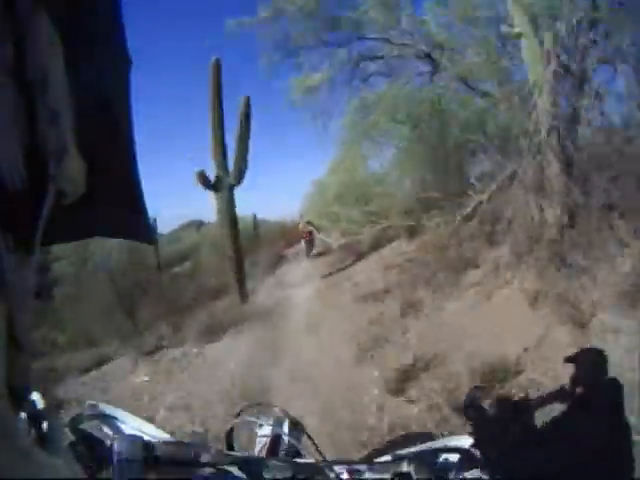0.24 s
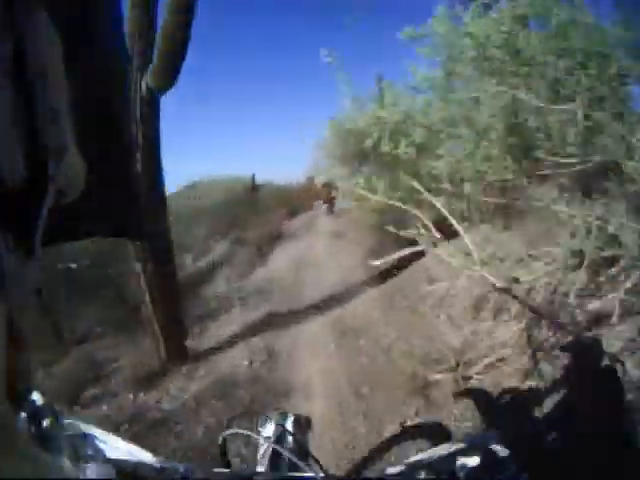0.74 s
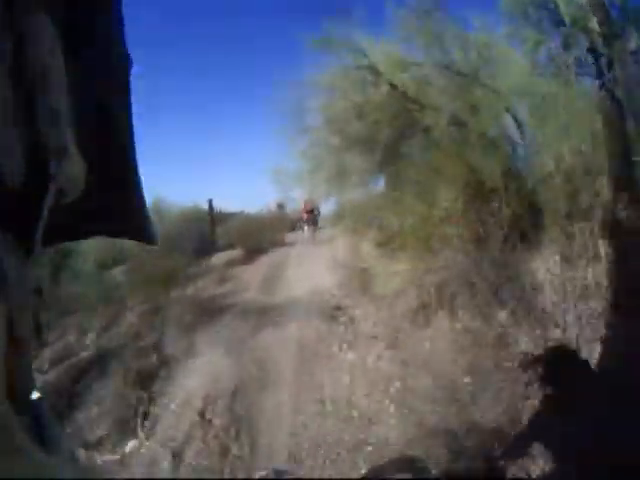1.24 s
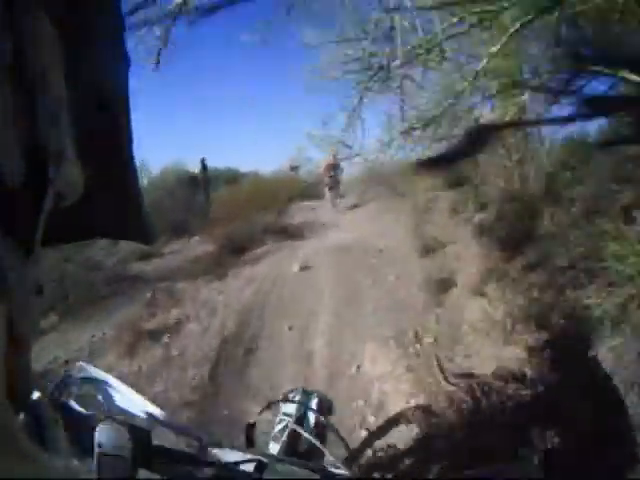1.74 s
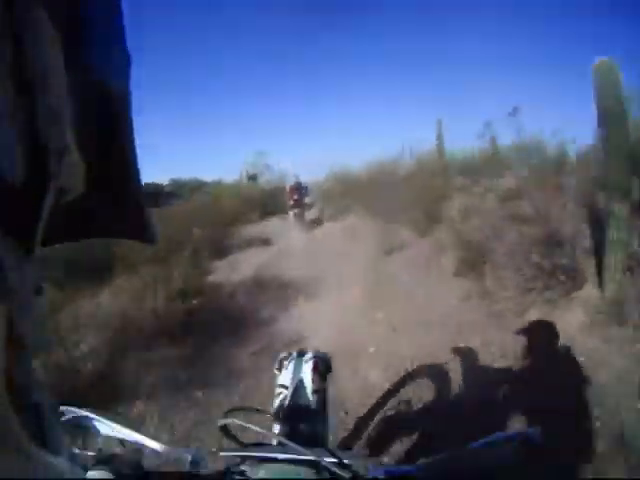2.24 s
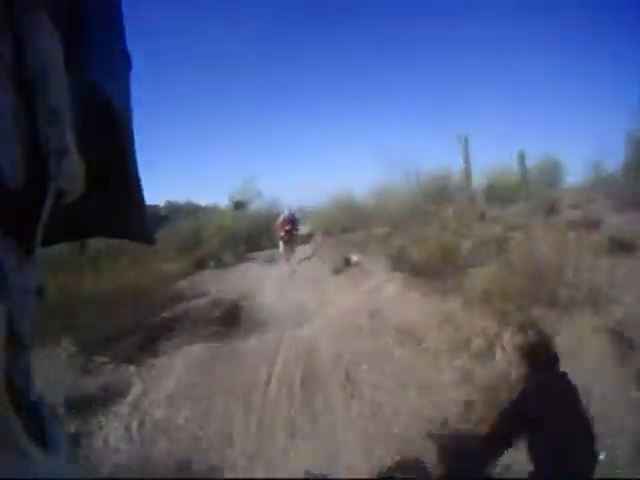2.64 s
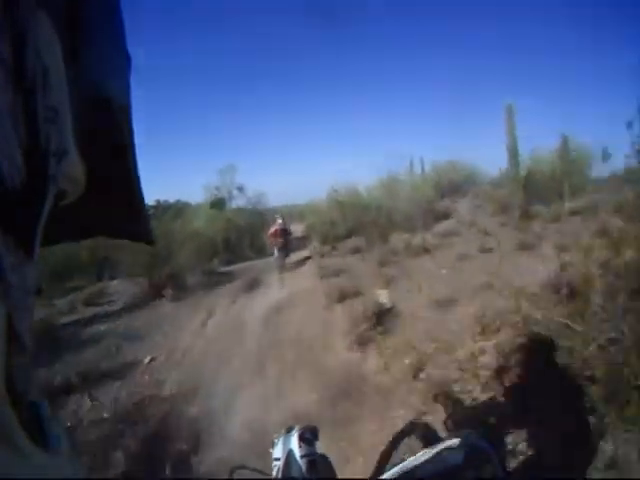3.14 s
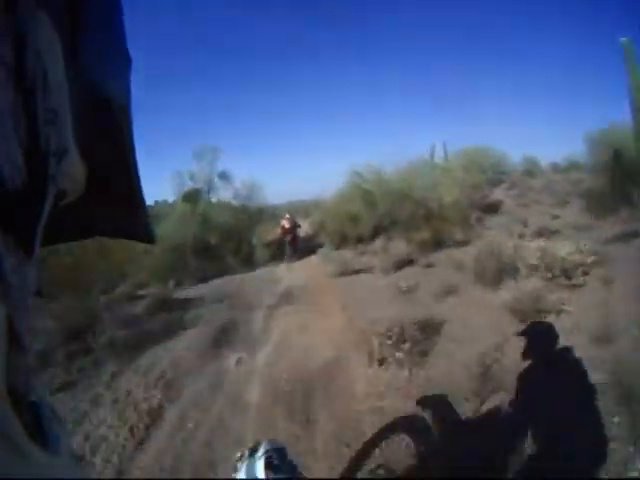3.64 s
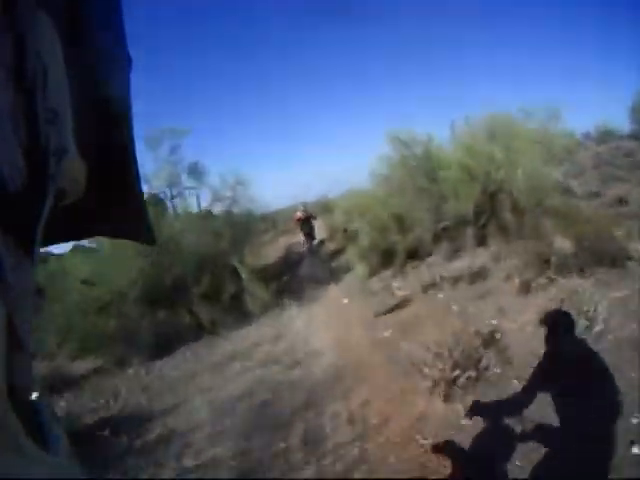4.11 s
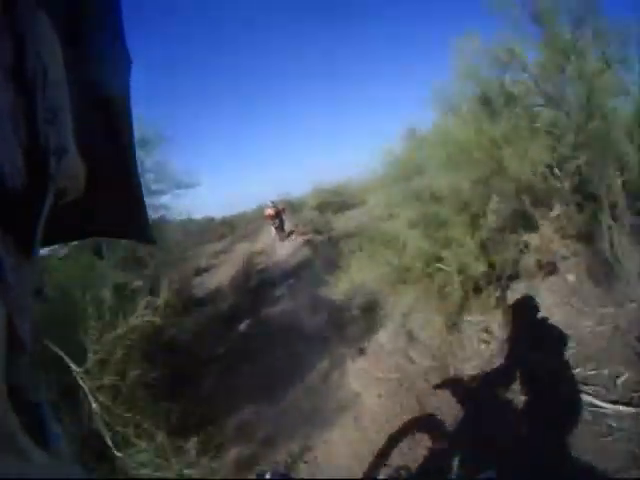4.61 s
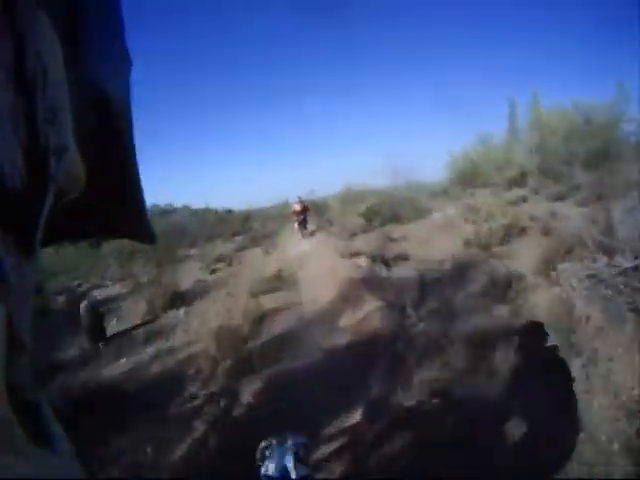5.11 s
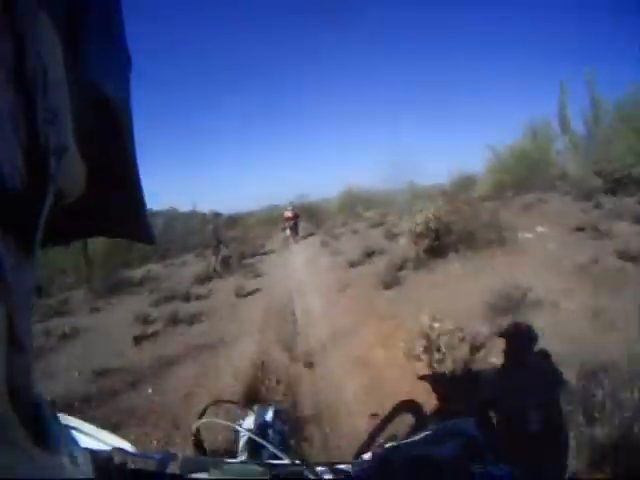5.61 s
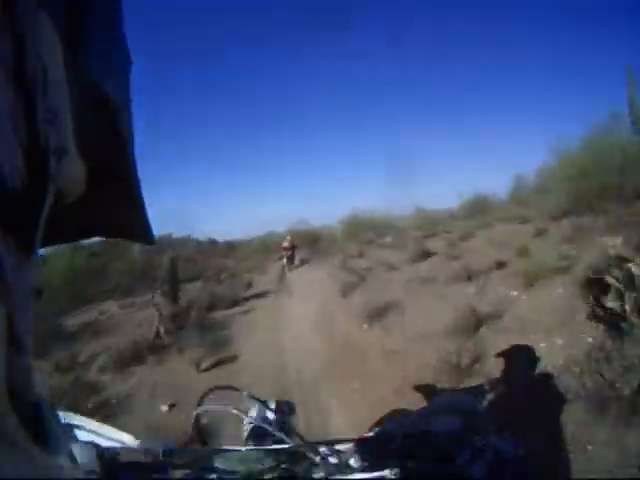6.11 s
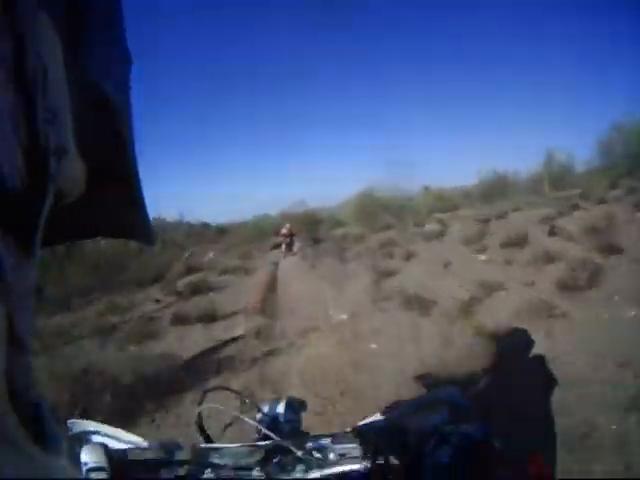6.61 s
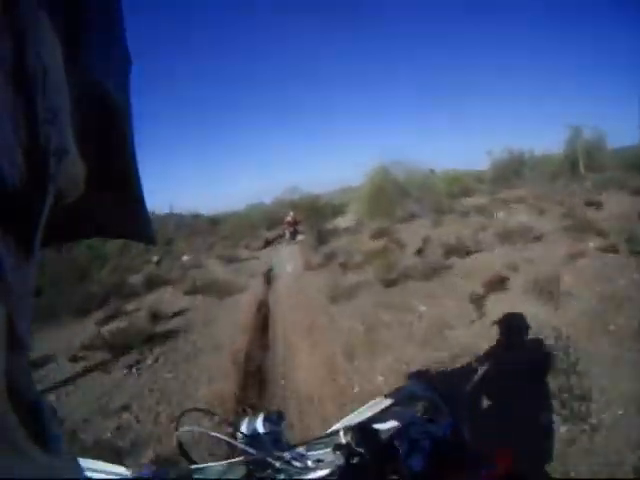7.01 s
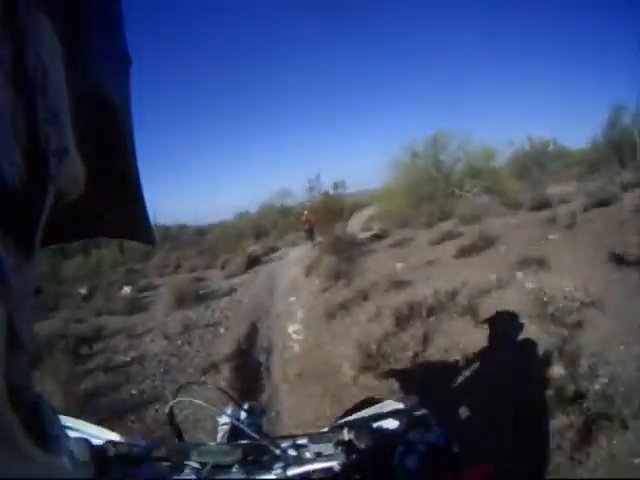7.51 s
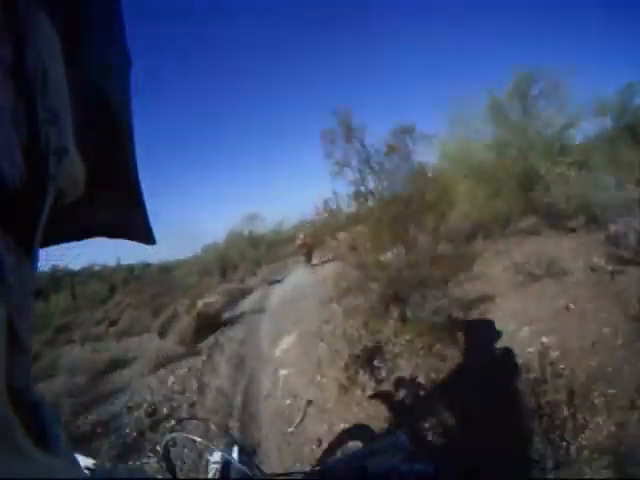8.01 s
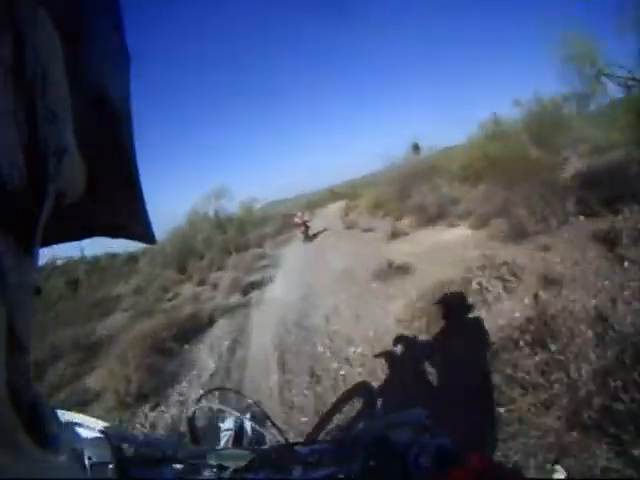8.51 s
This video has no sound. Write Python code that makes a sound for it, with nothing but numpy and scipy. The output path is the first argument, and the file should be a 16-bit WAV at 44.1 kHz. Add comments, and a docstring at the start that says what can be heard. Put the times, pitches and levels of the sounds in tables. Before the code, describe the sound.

A four-stroke dirt bike booms and clatters along a rocky trail, heard from the rider's helmet. Branches whip the microphone about a second in, then again with a loud, distorted scrape and thump. The engine revs up and down in short bursts, then sputters and pops at a higher speed. Wind buffets throughout over rumbling tyres, and the sound is dull and slightly fizzy.

```python
"""A four-stroke dirt bike booms and clatters up a rocky trail, heard close from a helmet camera.
The exhaust booms at the firing rate, the airbox honks as the throttle opens, the pipe pops when the
engine stumbles, and the clatter rings the camera's case. A second bike drones some way ahead.
Wind buffets the microphone; branches whip the helmet, shake the camera and overload it."""
import sys
import numpy as np
from scipy import signal
from scipy.fft import irfft
from scipy.io import wavfile
from scipy.ndimage import uniform_filter1d

SR = 44100
rng = np.random.default_rng(int(sys.argv[2]) if len(sys.argv) > 2 else 0)


def to_wav(s):
    """Save 16-bit WAV."""
    ch = np.atleast_2d(s).T  # columns
    pcm = np.round(np.clip(ch, -1, 1) * 32767)  # PCM
    wavfile.write(sys.argv[1], SR, pcm.astype(np.int16))


N = 385875
TIME = np.arange(N) / SR
BINS = np.fft.rfftfreq(8192, 1 / SR)

# resonances of the exhaust pipe (frequency [Hz], width [Hz], relative level [dB])
PIPE_MODES = [(144, 16, -3), (224.6, 104, 1), (267, 61, 4)]
# resonances of the airbox (frequency [Hz], width [Hz], relative level [dB])
AIRBOX_MODES = [(439.5, 101, 11), (530.5, 82, 6.5), (597, 12, 0), (702.4, 91, 5), (874, 100, -11.5)]
# resonances of the case around the microphone (frequency [Hz], width [Hz], relative level [dB])
CASE_MODES = [(1659, 290, -4), (2106, 125, -7.5), (2530, 140, -6), (2889, 108, -3), (3064, 120, -6)]
# spectrum of the mechanical clatter (frequency [Hz], relative level [dB])
CLATTER_SPECTRUM = [(200, -10), (600, 0.5), (1100, -13), (1500, -1), (1950, -27), (2350, -10.5), (2900, -3),
                    (3300, -5), (3800, -12.5)]


def surges(attack_s=0.04, release_s=0.15, run_down_s=0.2, rattle_down_s=0.23, coast_rough=0.35):
    """Throttle pulls that rev the engine up, and spells of sputter and clatter with no gain in revs."""
    # engine surges and rattles (start [s], end [s], firing rate gained [Hz], relative bark [dB],
    # relative honk [dB], relative clatter [dB], roughness [0-1])
    spells = [(0.0, 0.154, 1, -30, -32, -38.5, 1), (0.153, 0.41, 9, -27.5, -26.5, -33, 0.66),
              (2.08, 2.123, 0, -46, -50, -32, 0.2), (2.416, 2.503, 1, -31, -36, -43, 0.93),
              (2.511, 2.75, 33.5, -27.5, -20.5, -27.5, 0.32), (2.858, 3.08, 0, -36, -39.5, -35.5, 0.95),
              (3.101, 3.396, 16, -27, -24, -28, 0.73), (3.436, 3.541, 17, -27.5, -25, -29, 0.17),
              (3.851, 4.161, 24.5, -25.5, -24, -28.5, 0.33), (4.23, 4.274, 0, -39, -50, -31, 0.3),
              (5.425, 5.546, 0, -35, -38.5, -42.5, .5), (5.54, 5.839, 0, -30, -35, -40.5, 0.14),
              (5.857, 6.123, 10, -28, -26, -35, 0.37), (6.22, 6.45, 9, -27.5, -27, -32.5, 0.41),
              (6.488, 6.603, 1, -32, -32.5, -56, 0.5), (6.851, 6.887, 0, -29, -31, -39, 0.67),
              (7.148, 7.438, -0.5, -29.5, -34, -38, 0.99), (7.73, 7.931, 0, -30.5, -37.5, -39, 1)]
    surge, revs_hz, extra_rough, bark_power, honk_power, clatter_power = np.zeros((6, N))
    for start, end, gained_hz, bark_db, honk_db, clatter_db, rough in spells:
        length = end - start
        gate = hump(length, attack_s, release_s)
        spin = hump(length, attack_s, rattle_down_s)
        climb = hump(length, length, np.inf)
        swell_db = 6.5 * np.tanh(gained_hz / 4.6) * (climb - 1)  # louder as the engine picks up
        # past 14.6 Hz of gain the engine breathes out of tune with the airbox
        detune_db = 0.92 * np.maximum(gained_hz * climb - 14.6, 0)
        add(surge, start, gate)
        add(revs_hz, start, gained_hz * hump(length, length, run_down_s))
        add(extra_rough, start, (rough - coast_rough) * gate)
        add(bark_power, start, (amp(bark_db + swell_db) * gate) ** 2)
        add(honk_power, start, (amp(honk_db + swell_db - detune_db) * gate) ** 2)
        add(clatter_power, start, (amp(clatter_db + swell_db) * spin) ** 2)
    layers = [(bark_power, -49), (honk_power, -52.5), (clatter_power, -37.5)]
    levels_db = [10 * np.log10(power + amp(coast_db) ** 2) for power, coast_db in layers]
    return np.minimum(surge, 1), revs_hz, np.clip(coast_rough + extra_rough, 0, 1), *levels_db


def exhaust(cycles, surge, revs_hz, steady_hz=48):
    """A deep boom once per firing, thinner and less steady at speed, with weak wavering overtones."""
    # the boom with the throttle shut (time [s], relative level [dB])
    boom_levels = [(0, -8), (.5, -17.5), (.76, -11), (1.02, -22), (1.1, -29.5), (1.48, -13.5),
                   (2.34, -17.5), (2.44, -24), (2.88, -23), (2.95, -11.5), (3.7, -22), (4.3, -20),
                   (4.9, -14.5), (5.35, -17), (5.6, -27), (6.55, -24.5), (6.89, -9), (6.97, -25),
                   (8.08, -35), (8.34, -23), (8.74, -27.5)]
    # its overtones (multiple of the firing rate, level [dB])
    overtones = [(2, -42), (3, -48), (4, -48), (5, -54.5), (6, -58.5), (7, -47.5)]
    level_db = follow(boom_levels)[0] + 6 - 3 * surge - 0.47 * revs_hz
    firing_hz = np.gradient(cycles) * SR
    flutter_db = 1 + 0.0821 * np.maximum(firing_hz - steady_hz, 0)
    boom = amp(level_db + flutter_db * wander(hz=10)) * np.sin(2 * np.pi * cycles)
    for order, db in overtones:
        boom += amp(db + 3 * wander(hz=14)) * np.sin(2 * np.pi * (order * cycles + rng.random()))
    return np.sqrt(2) * boom


def firing(cycles, rough, puff_cycles=0.86):
    """Pressure pulses, each with a puff of turbulent gas that grows with roughness."""
    gas = unit(np.exp(-(cycles % 1) / puff_cycles) * rng.standard_normal(N))
    gas_share = 0.87 * rough
    return (unit(pulses(cycles)) + gas_share * gas) / np.hypot(1, gas_share)


def sputter(cycles, rough):
    """A rough engine fires unevenly: how much stronger or weaker each firing is, in dB."""
    chance = rng.standard_normal(N)[np.floor(cycles).astype(int)].clip(-1.5, 1.5)
    spread_db = 2.5 * rough
    bias_db = 20 * np.log10(np.cosh(spread_db * np.log(10) / 20))  # holds the mean strength about even
    return uniform_filter1d(spread_db * chance - bias_db, size=90)


def bark(cycles, rough, level_db):
    """Firing pulses ring the exhaust pipe, which barks under load."""
    return amp(level_db) * colour(firing(cycles, rough), peaks(PIPE_MODES))


def intake(cycles, rough, level_db, shut_phase=0.364):
    """The inlet valve, opening and snapping shut, makes the airbox honk."""
    valve = firing(cycles, rough) + 0.85 * firing(cycles + 1 - shut_phase, rough)
    return amp(level_db + 1) * colour(valve, peaks(AIRBOX_MODES))


def pops(attack_s=0.001, t60=0.032):
    """Unburnt mixture goes off in the pipe: a short puff that rings pipe, airbox and camera case."""
    # stumbles of the engine (time [s], relative level [dB])
    stumbles = [(2.921, -16), (6.893, -8), (7.352, -16), (7.446, -18), (7.469, -14), (7.564, -17.5),
                (7.836, -16.5), (7.891, -14), (7.934, -15), (8.016, -14)]
    force, t = np.zeros(N), np.arange(SR // 10) / SR
    for s, db in stumbles:
        add(force, s, amp(db - 6) * np.minimum(t / attack_s, 1) * decay(t, t60))
    resonances = peaks(PIPE_MODES) + amp(-3) * peaks(AIRBOX_MODES) + amp(-10) * peaks(CASE_MODES)
    return force * colour(rng.standard_normal(N), resonances)


def clatter(cycles, honk_db, level_db):
    """Valve ticks and the grit of chain and gravel throb with the engine and ring the camera's case."""
    effort = amp((honk_db - honk_db.max()) / 2)  # the ticks harden into a rasp under load
    throb = 1 + 0.068 * np.cos(2 * np.pi * cycles)
    grit = unit(throb * amp(1.23 * wander(hz=70)) * rng.standard_normal(N))
    ticks = unit((pulses(cycles) + pulses(cycles - 0.43)) * amp(3 * wander(hz=92)))
    gain = amp(level_db + 1 + wander(hz=23.2))
    spectrum = shape(CLATTER_SPECTRUM) + amp(3) * peaks(CASE_MODES)
    return gain * colour(grit + 0.5 * effort * ticks, spectrum)


def clanks(width_hz=450):
    """Chain and frame clank over the rocks: brief metallic rattles, each around one pitch."""
    # knocks from the trail (time [s], relative level [dB], pitch [Hz], t60 [s])
    knocks = [(0.055, -26, 2820, 0.05), (0.707, -31, 2800, 0.044), (2.529, -28, 2850, 0.097),
              (3.049, -25, 3000, 0.037), (3.097, -29.5, 1599, 0.043), (3.927, -29, 2980, 0.16),
              (4.213, -26.5, 2340, 0.082), (4.514, -31.5, 2880, 0.09), (5.721, -29, 2720, 0.043),
              (6.945, -39, 2867, .05), (7.449, -29.5, 1570, 0.08)]
    out, t = np.zeros(N), np.arange(SR // 3) / SR
    for s, db, hz, t60 in knocks:
        spectrum = peaks([(hz, width_hz, 0)]) + amp(-12) * shape(CLATTER_SPECTRUM)
        rattle = colour(rng.standard_normal(len(t)), spectrum)[:len(t)]
        add(out, s, amp(db + 2) * decay(t, t60) * unit(rattle))
    return out


def gears(cycles, cruise_hz, order=15.9, fastest_db=-53.5, db_per_hz=0.9):
    """A faint unsteady whine follows the crank and sings louder as the bike rolls faster."""
    level_db = fastest_db + db_per_hz * (cruise_hz - cruise_hz.max()) + 4 * wander(hz=10.4)
    return amp(level_db) * np.sqrt(2) * np.sin(2 * np.pi * order * cycles + 1.3 * wander(hz=25))


def branches(release_s=0.0057):
    """Each branch drags over the case, right at the microphone, in a burst of tiny slips."""
    # twigs and branches on the helmet (time [s], contact length [s], level [dB])
    scrapes = [(0.996, 0.0026, -8.5), (0.997, 0.0032, -16.5), (1.0057, 0.01, -7.5), (1.042, 0.017, -29),
               (1.527, 0.0021, -23), (1.774, 0.013, -19), (1.785, 0.0071, -12.5), (1.799, 0.0057, 1.5),
               (1.811, 0.0077, -1), (1.831, 0.021, -1.5), (1.884, 0.046, 3), (2.0081, 0.039, 3)]
    # spectrum of the scraping (frequency [Hz], relative level [dB])
    scrape_spectrum = [(60, 3.5), (150, 5.5), (300, -5.5), (520, 3.5), (750, -3), (1000, -1), (1600, -6.5),
                       (2000, -8.5), (2480, 7.5), (2800, -1), (3200, -0.5), (3800, -5)]
    force, t = np.zeros(N), np.arange(SR // 5) / SR
    for s, length, db in scrapes:
        add(force, s, amp(db) * np.exp(-np.maximum(t - length, 0) / release_s))
    slips = amp(3 * wander(hz=700)) * rng.standard_normal(N)
    return force * colour(slips, shape(scrape_spectrum) + amp(4) * peaks(CASE_MODES))


def mount(swing_hz=49.3):
    """The jolted camera swings on its mount and pumps the air at the microphone."""
    # jolts to the camera (time [s], level [dB], t60 [s])
    jolts = [(1.8308, 15.5, 0.049), (1.852, 14, .25), (1.9136, 15.5, 0.21), (2.0596, 13.5, 0.22),
             (2.923, -8.5, 0.3), (4.396, -1, 0.3)]
    swing, t = np.zeros(N), np.arange(SR // 2) / SR
    for s, db, t60 in jolts:
        add(swing, s, amp(db) * decay(t, t60) * np.sin(2 * np.pi * swing_hz * t))
    return swing


def wind():
    """Lumpy turbulence around the helmet buffets the microphone."""
    # gusts on the helmet (peak time [s], length [s], relative level [dB])
    gusts = [(0.7, 0.53, -28), (1.275, 0.3, -34), (2.246, 0.41, -23), (2.94, 0.26, -21.5),
             (3.678, 0.28, -47.5), (4.443, 0.31, -17), (4.797, 0.55, -35), (6.269, 0.29, -16.5),
             (6.681, 0.17, -26), (7.024, .2, -33), (7.569, .3, -25.5), (8.22, 0.28, -23.5),
             (8.503, 0.46, -37)]
    # spectrum of the buffeting (frequency [Hz], relative level [dB])
    wind_spectrum = [(12, 18.5), (25, 19), (45, 9.5), (80, -7), (160, -19), (320, -37), (700, -73),
                     (1500, -62)]
    strength = np.full(N, amp(-34.5))  # the steady headwind between gusts
    for s, length, db in gusts:
        half = length / 2
        add(strength, s - half, amp(db) * hump(half, half, half))
    return strength * amp(12 + 3 * wander(hz=8.3)) * colour(rng.standard_normal(N), shape(wind_spectrum))


def tyres(level_db=-34):
    """Below the rider, the tyres rumble steadily over the dirt."""
    # spectrum of the rumble (frequency [Hz], relative level [dB])
    roll_spectrum = [(30, 6.5), (80, -2), (160, 4), (320, -4.5), (600, -19), (1000, -17), (2000, -23),
                     (3800, -36.5)]
    return amp(level_db + 2 * wander(hz=19)) * colour(rng.standard_normal(N), shape(roll_spectrum))


def bike_ahead(centre_hz=360, width_hz=200):
    """From far up the trail, a second engine carries only as a few wavering harmonics."""
    # the distant engine (time [s], firing rate [Hz], level [dB])
    far_engine = [(0, 68, -46), (.8, 138, -56), (1.35, 56, -50), (1.7, 58, -38.5), (2.3, 50.6, -40.5),
                  (4.5, 59, -44), (5.3, 28, -93), (7, 64, -79), (8.75, 46, -41)]
    firing_hz, level_db = follow(far_engine)
    cycles = np.cumsum(firing_hz * (1 + 0.0061 * wander(hz=4.9))) / SR
    drone = colour(pulses(cycles), peaks([(centre_hz, width_hz, 0)]))
    return amp(level_db + 0.93 * wander(hz=4.5)) * drone


def amp(db):
    """Decibels to gain."""
    return 10 ** (np.asarray(db) / 20)


def unit(x):
    """Scales to rms 1."""
    return x / np.sqrt(np.mean(x ** 2) + 1e-20)


def follow(rows):
    """Each column of a timed curve, sample by sample."""
    s, *columns = np.transpose(rows)
    return [np.interp(TIME, s, column) for column in columns]


def shape(points):
    """Gain per bin of a spectrum (frequency [Hz], level [dB])."""
    hz, db = np.transpose(points)
    return amp(np.interp(np.log(BINS + 1), np.log(hz), db))


def peaks(modes):
    """Gain per bin of a set of resonances (frequency [Hz], width [Hz], level [dB])."""
    power = sum(amp(db) ** 2 / (1 + (2 * (BINS - hz) / width) ** 2) ** 2 for hz, width, db in modes)
    return np.sqrt(power)


def colour(x, gain):
    """Minimum-phase filter with the given gain per bin; the result has rms 1."""
    log_gain = np.log(gain / gain.max() + 1e-5)
    mirrored = np.concatenate([log_gain, log_gain[-2:0:-1]])
    taps = np.fft.ifft(np.exp(np.conj(signal.hilbert(mirrored)))).real[:len(BINS)]
    return unit(signal.oaconvolve(x, taps)[:N])


def wander(hz, size=16384):
    """Smooth random drift of rms 1, rolling off above hz."""
    real, imaginary = rng.standard_normal((2, size))
    f = np.arange(size) * SR / N
    return unit(irfft((real + 1j * imaginary) * np.exp(-(f / hz) ** 2), N))


def pulses(cycles):
    """One click at each whole cycle, shared between the two nearest samples."""
    passed = np.floor(cycles) + np.clip((cycles % 1) / np.gradient(cycles), 0, 1)
    return np.diff(passed, prepend=passed[0])


def hump(length, rise, fall):
    """One second of envelope: eases up over rise, holds until length, eases down over fall (all in s)."""
    t = np.arange(SR) / SR
    up = np.sin(np.pi / 2 * np.clip(t / rise, 0, 1))
    down = np.cos(np.pi / 2 * np.clip((t - length) / fall, 0, 1))
    return (up * down) ** 2


def decay(t, t60):
    """Envelope that falls 60 dB in t60 seconds."""
    return np.exp(-np.log(1000) * t / t60)


def add(mix, s, sound):
    """Mixes a sound in at s seconds."""
    part = mix[round(s * SR):][:len(sound)]
    part += sound[:len(part)]


def scene():
    """The mono mix at the helmet: one firing rate drives exhaust, intake, clatter and gears."""
    # engine speed as the bike rolls between throttle pulls (time [s], firing rate [Hz])
    cruise = [(0, 48), (.8, 50.6), (1.1, 48.7), (1.75, 47.2), (2.0, 57.5), (2.22, 50.3), (2.44, 44),
              (3.1, 43), (4.85, 44.5), (5.2, 45.3), (5.72, 46.7), (6.28, 46), (6.66, 51), (6.86, 45),
              (7.04, 58.7), (7.3, 62), (8.0, 62.5), (8.75, 62)]
    cruise_hz, = follow(cruise)
    surge, revs_hz, rough, bark_db, honk_db, clatter_db = surges()
    firing_hz = (cruise_hz + revs_hz) * (1 + 0.005 * wander(hz=15))
    cycles = np.cumsum(firing_hz) / SR  # one cycle per firing
    firing_db = sputter(cycles, rough)
    engine = exhaust(cycles, surge, revs_hz) + bark(cycles, rough, bark_db + firing_db)
    engine += intake(cycles, rough, honk_db + firing_db) + pops()
    machinery = clatter(cycles, honk_db, clatter_db + 0.84 * firing_db)
    machinery += gears(cycles, cruise_hz) + clanks()
    return (engine + machinery + bike_ahead() + wind() + tyres() + branches() + mount())[None]


def record(dry, sample_hz=8000, ceiling=1.3, low_cut_hz=90, high_cut_hz=16000):
    """A cheap camera samples slowly, saturates, cuts the lows and clicks as it overflows full scale."""
    clipped = np.clip(signal.resample_poly(dry[0], sample_hz, SR), -ceiling, ceiling)
    thinned = signal.lfilter(*signal.butter(1, low_cut_hz, "high", fs=sample_hz), clipped)
    overflowed = thinned - np.trunc(thinned)
    # samples held as steps mirror the sound into the treble: a fizz, and a whine from the boom
    steps = signal.resample_poly(np.repeat(overflowed, 12), SR, 12 * sample_hz)[:N]
    lowpass_taps = signal.firwin(301, high_cut_hz, window=("kaiser", 7), fs=SR)
    return signal.oaconvolve(steps, lowpass_taps, "same")[None]


dry = scene()
out = record(dry)
to_wav(out)
```